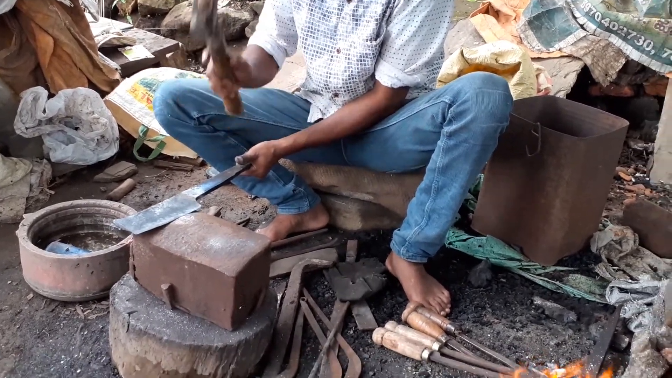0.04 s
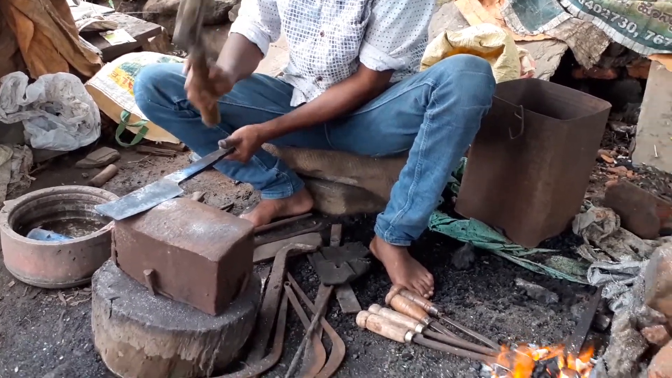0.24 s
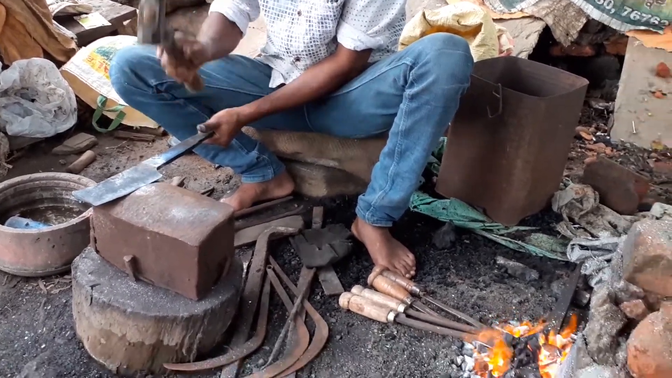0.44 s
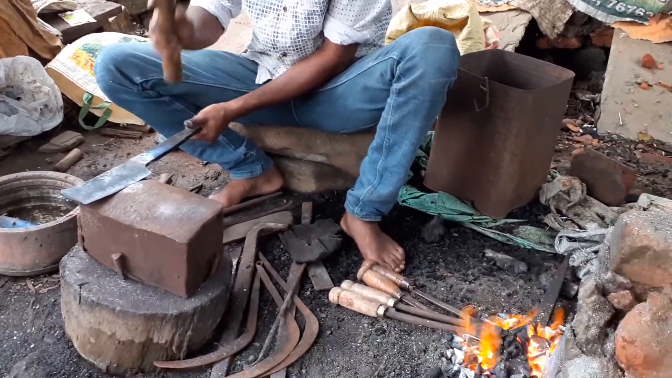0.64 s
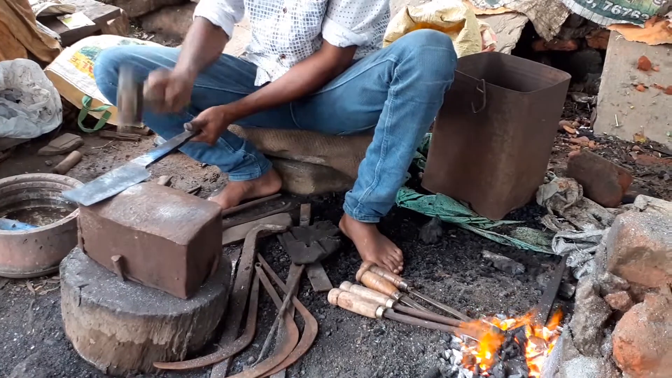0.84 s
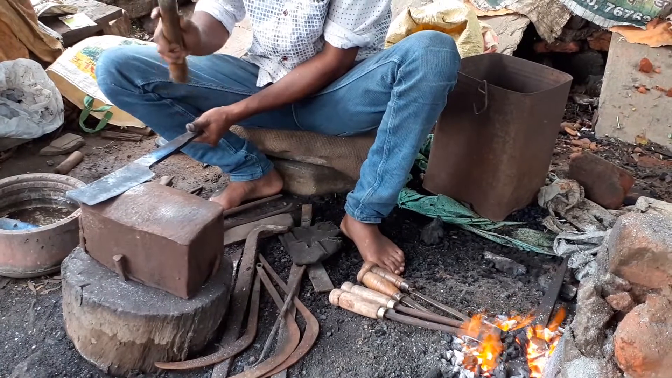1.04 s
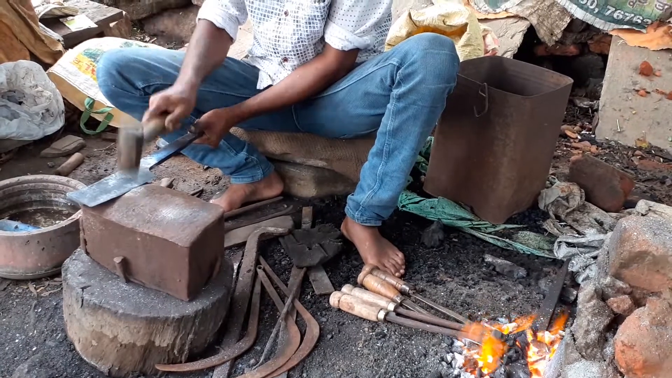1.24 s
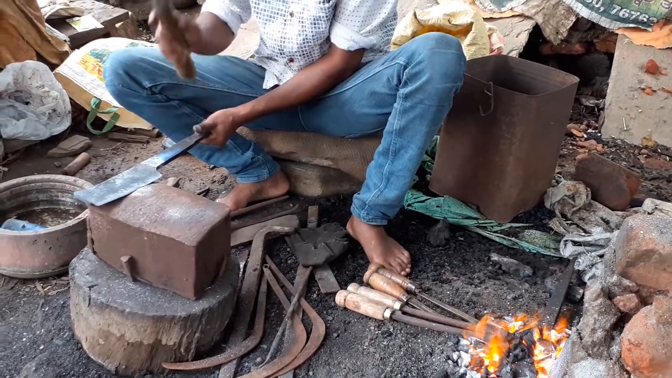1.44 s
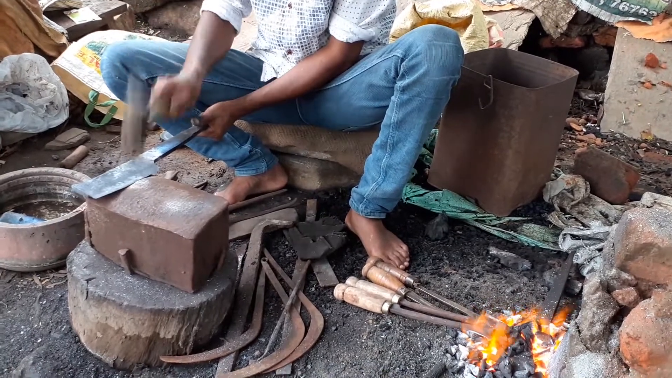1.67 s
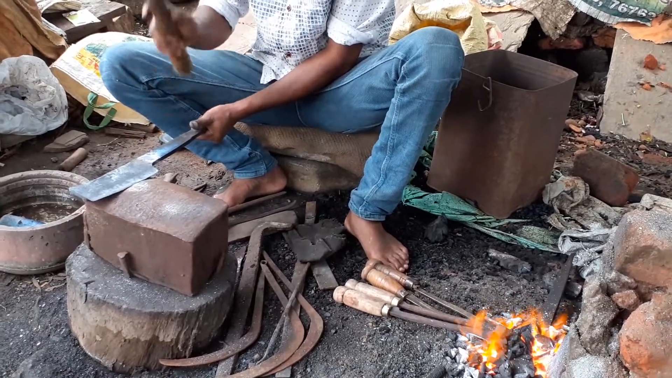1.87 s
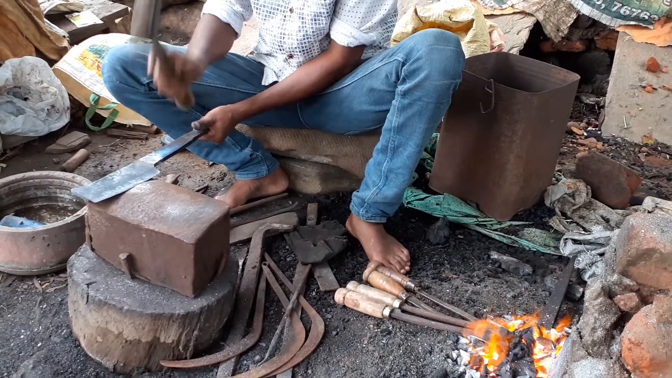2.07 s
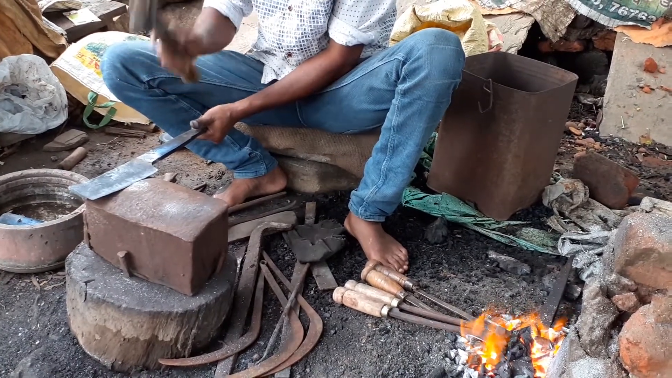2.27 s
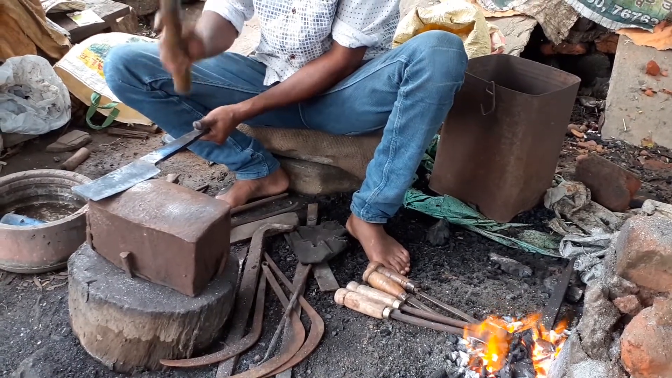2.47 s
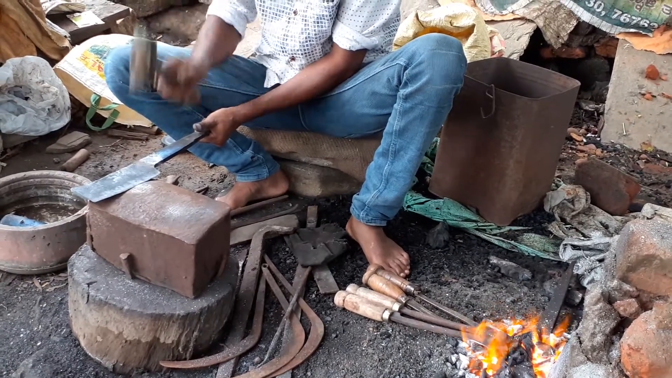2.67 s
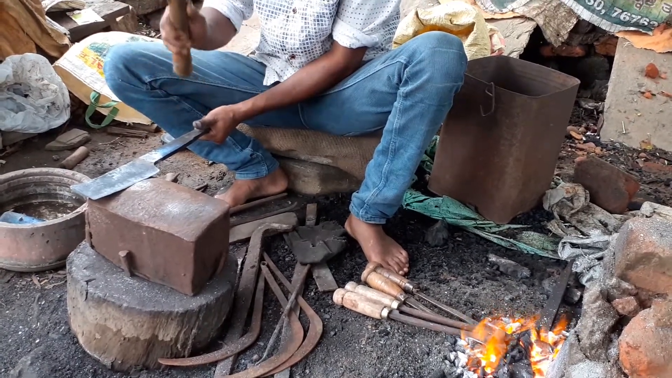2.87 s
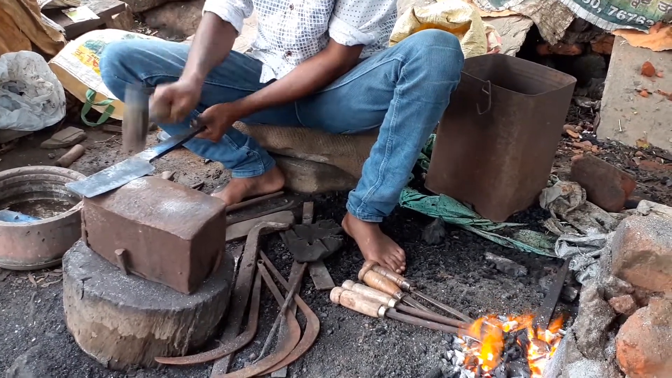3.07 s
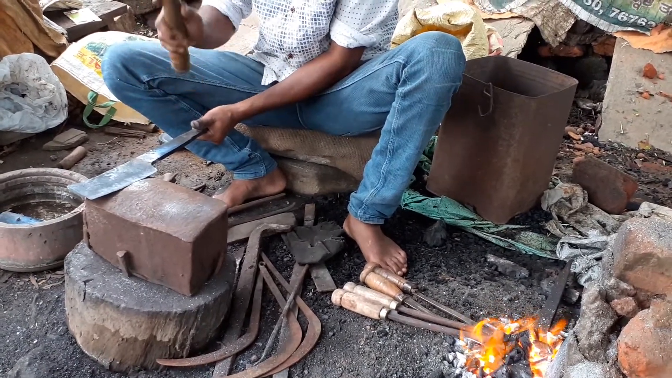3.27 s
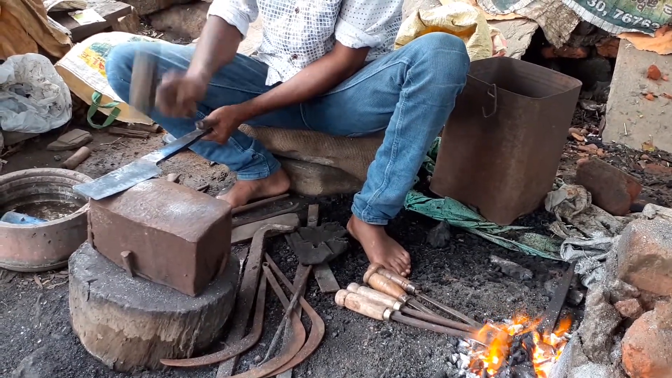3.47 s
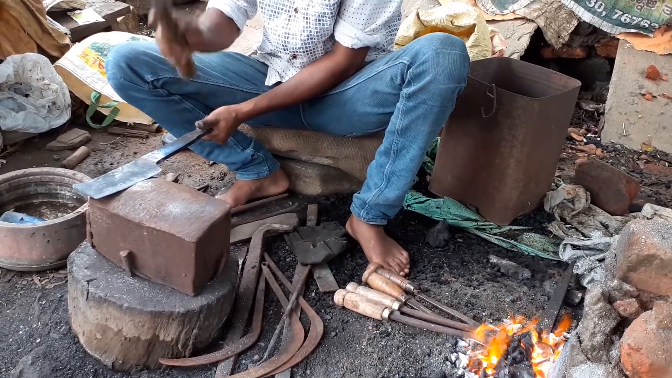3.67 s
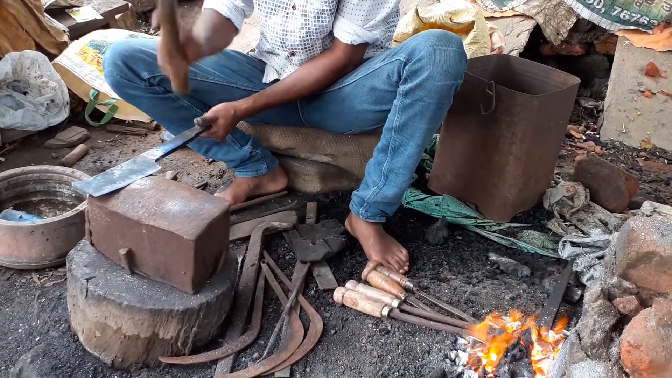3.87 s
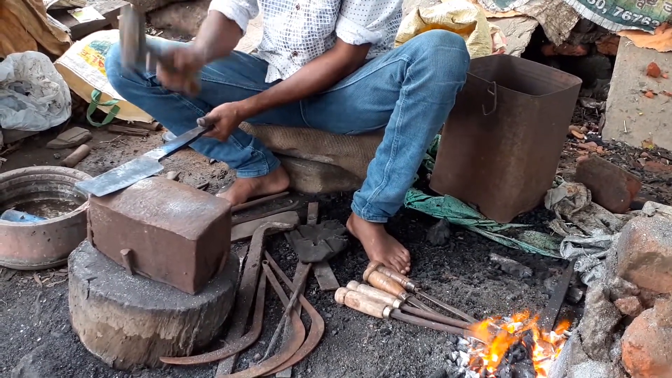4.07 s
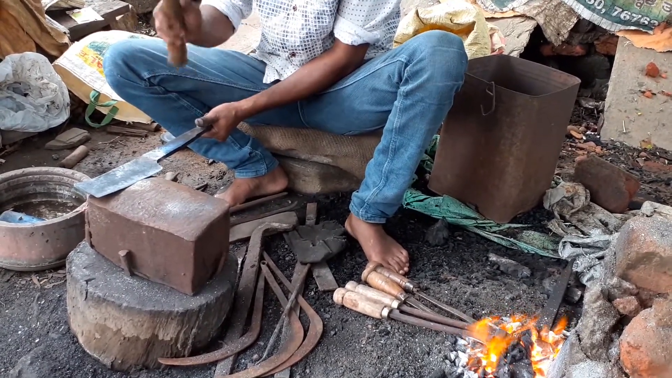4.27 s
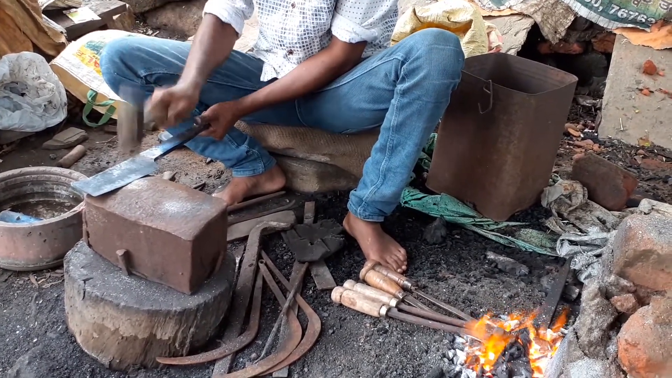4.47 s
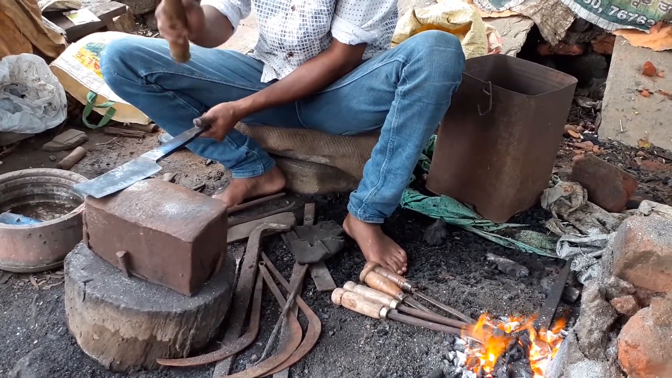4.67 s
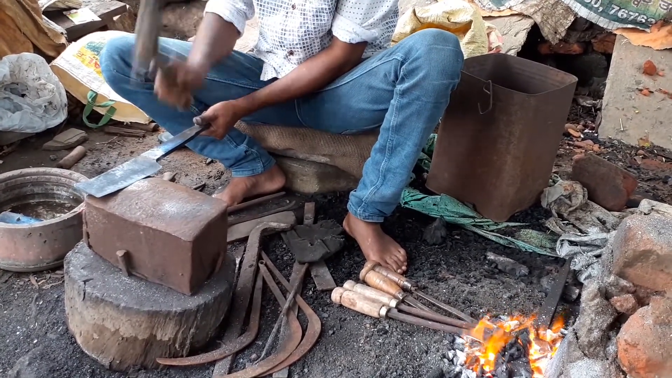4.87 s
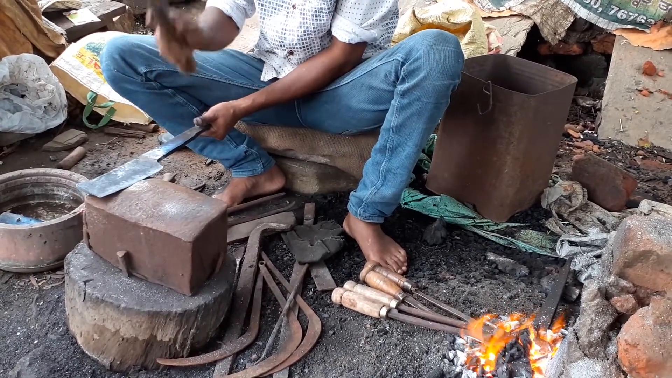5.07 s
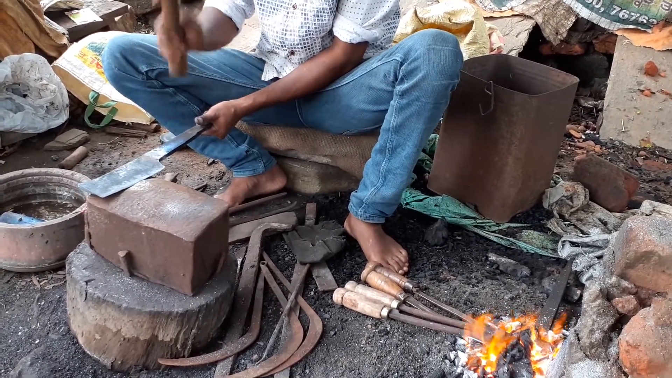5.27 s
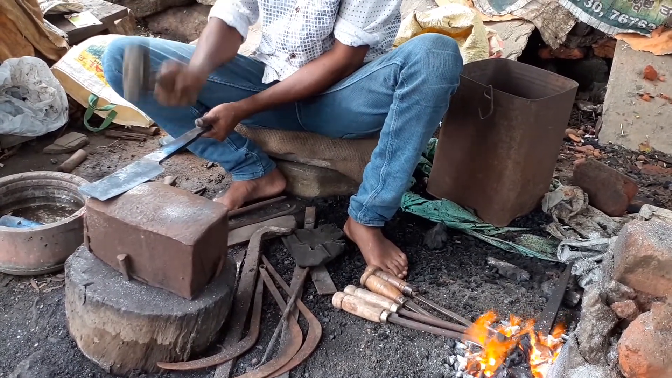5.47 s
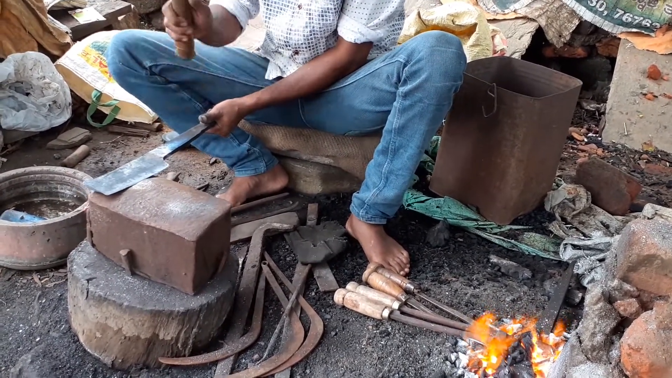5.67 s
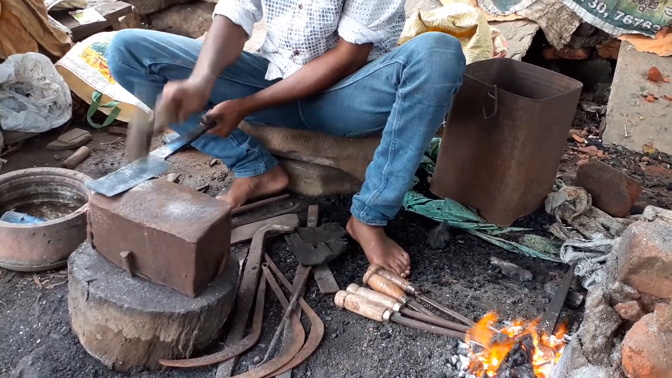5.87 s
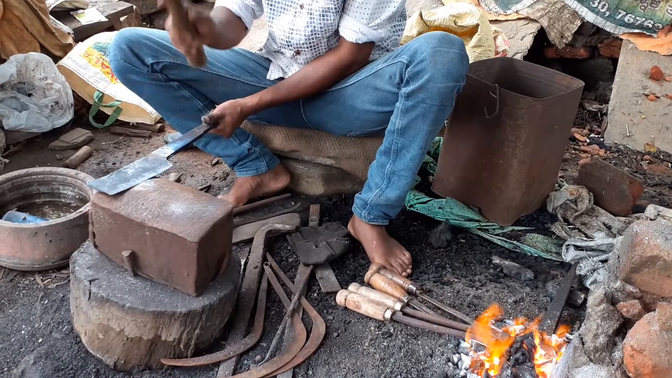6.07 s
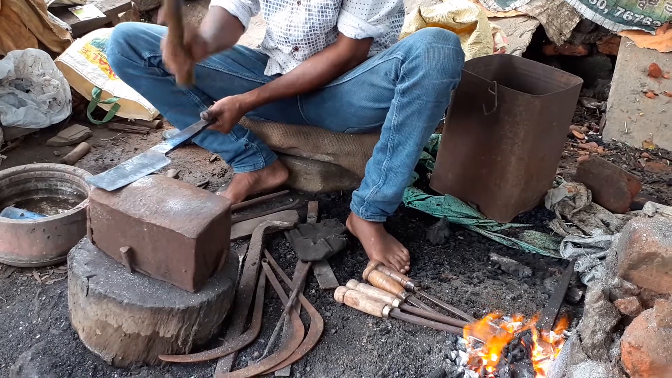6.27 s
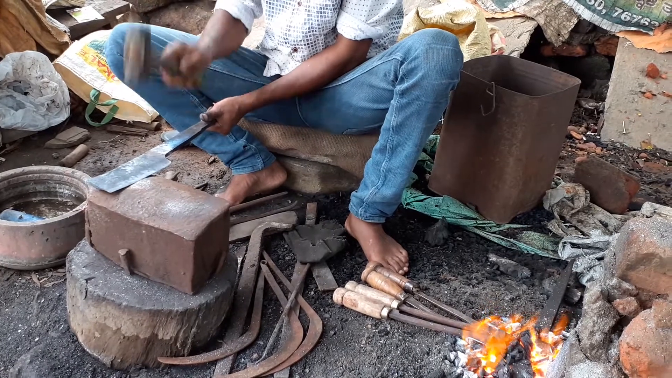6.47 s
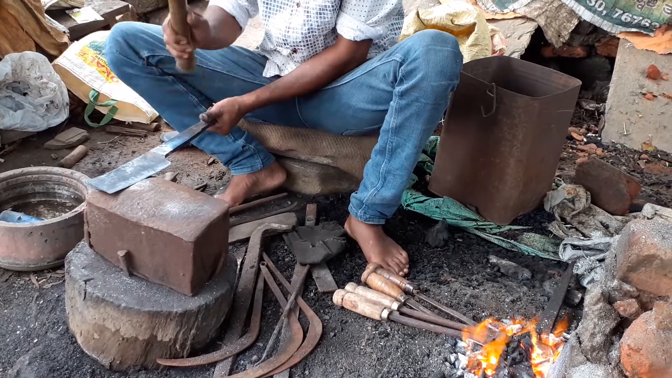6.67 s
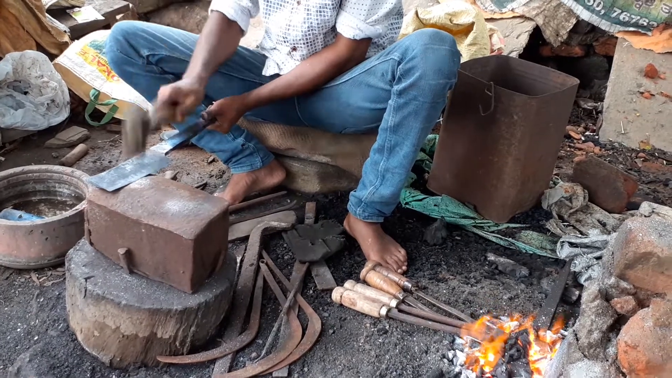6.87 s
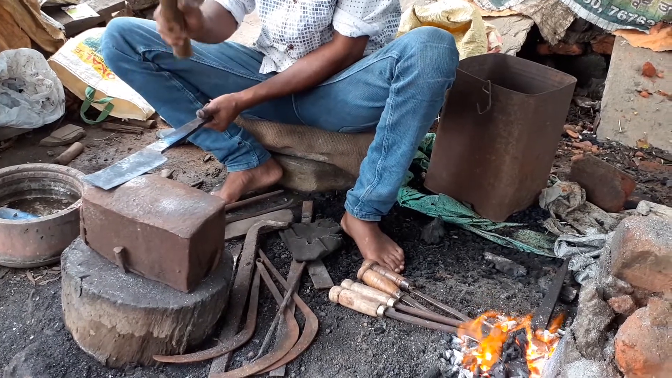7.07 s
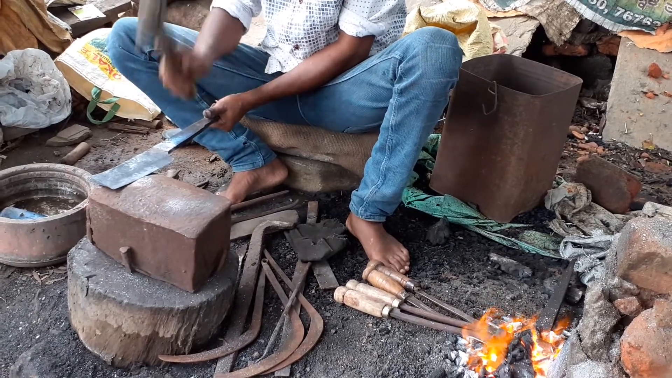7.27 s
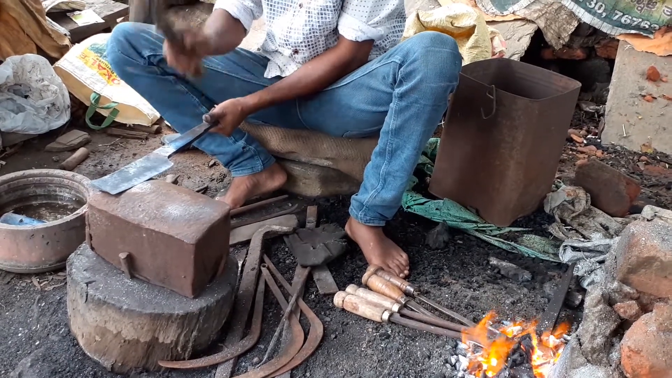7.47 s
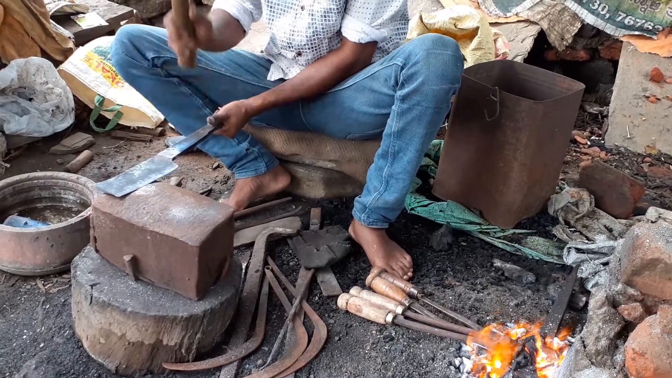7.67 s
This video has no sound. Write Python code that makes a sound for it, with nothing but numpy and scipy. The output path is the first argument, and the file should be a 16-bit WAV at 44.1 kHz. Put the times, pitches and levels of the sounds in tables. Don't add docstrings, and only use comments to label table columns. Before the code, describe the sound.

Close, loud hammer blows on a steel blade and block anvil, evenly about two per second, each a sharp clattering crack with a short thud and a clean high ring cut off by the next blow. A cranked blower rattles and whirrs throughout. Midway a small engine putters past and fades. Open-sided outdoor forge, close stereo microphones, peaks flattened.

```python
import sys
import numpy as np
from scipy import signal
from scipy.io import wavfile
from scipy.ndimage import uniform_filter1d, minimum_filter1d

SR = 44100
rng = np.random.default_rng(int(sys.argv[2]) if len(sys.argv) > 2 else 0)


def int16_out(signal):
    q = np.round(np.clip(np.atleast_2d(signal).T, -1, 1) * 32767)
    wavfile.write(sys.argv[1], SR, q.astype(np.int16))


def linear_from_db(decibels):
    return 10 ** (np.asarray(decibels, float) / 20)


N = 340443


def at_hz(points, hz):
    return np.interp(np.log(hz), np.log(np.array(points)[:, 0]), np.array(points)[:, 1])


def in_time(rows):
    s, *columns = np.transpose(rows)
    return [np.interp(np.arange(N) / SR, s, c) for c in columns]


def rms_one(x):
    return x / np.sqrt(np.mean(x ** 2) + 1e-20)


def pan(db):
    return linear_from_db(np.array([[db / 2], [-db / 2]]))


def left_late(x, size):
    return np.array([np.roll(x[0], size), x[1]])


def filtered(sos, x):
    return signal.sosfilt(sos, x)


def drift(rate_hz):
    r = np.exp(-80 * np.pi * rate_hz / SR)
    noise = rng.standard_normal(N // 40 + 2002)
    slow = signal.lfilter([1], [1, -2 * r, r * r], noise)[2000:]
    return np.interp(np.arange(N) / 40, np.arange(len(slow)), rms_one(slow))


def ring(clicks, hz, t60):
    r, w = linear_from_db(-60 / (t60 * SR)), 2 * np.pi * hz / SR
    return signal.lfilter([0, np.sin(w)], [1, -2 * r * np.cos(w), r * r], clicks + 1e-18)


# pitch_hz, likeness_0_to_1
LIKENESS = [(30, .2), (60, 0.99), (130, 0.96), (300, 1), (700, 0.87), (1500, 0.2), (4000, 0), (8000, 0),
            (15000, 0)]


def bands(low_hz, high_hz, size):
    edges = low_hz * 2 ** np.arange(0, np.log2(high_hz / low_hz) + .3, 1 / 3)
    white = rng.standard_normal((2, 2, size))
    for k, (low, high) in enumerate(zip(edges, edges[1:])):
        band = signal.butter(2, [low, high], "band", fs=SR, output="sos")
        mid, side = filtered(band, white[k % 2])
        hz = np.sqrt(low * high)
        alike = np.clip(at_hz(LIKENESS, hz), 0, 1)
        yield hz, np.sqrt(1 + alike) * mid + np.sqrt(1 - alike) * side * [[1], [-1]]


def wind():
    band = signal.butter(2, [30, 80], "band", fs=SR, output="sos")
    low = filtered(band, rng.standard_normal((2, N)))
    gusts_db = 4.6 * np.array([drift(3.0), drift(5.2)])
    return linear_from_db(-82.0 + gusts_db) * rms_one(low)


# time_s, level_db
ENGINE = [
    (2.9, -52),
    (3.2, -46.5),
    (4.2, -52.5),
    (4.7, -43.5),
    (5.2, -36.5),
    (5.7, -44.5),
    (6.1, -45.5),
    (6.5, -49),
    (7.7, -53.5),
]
# pitch_hz, level_db, t60_s
EXHAUST = [(91.5, 0.5, 0.13), (183.3, 6, 0.095), (260, -19, 0.013)]


def engine():
    firing_at_s, firings_per_s, slowing_per_s2 = 4.574, 23.9, 2.3
    t = np.arange(-1, N) / SR - firing_at_s
    turns = firings_per_s * t - slowing_per_s2 * t ** 2 / 2
    fired = np.diff(np.floor(turns)) > 0
    pulses = np.roll(fired, 310) * linear_from_db(2.5 * rng.standard_normal(N))
    pipe = np.zeros(N)
    for k, (hz, db, t60) in enumerate(EXHAUST):
        pipe += (-1) ** k * linear_from_db(db) * ring(pulses, hz, t60)
    soft = filtered(signal.butter(2, 320, fs=SR, output="sos"), pipe)
    level_db, = in_time(ENGINE)
    return linear_from_db(level_db + 2.0) * rms_one(soft) * (np.arange(N) > ENGINE[0][0] * SR)


# start_s, peak_db
JOLTS = [(0.7494, -33), (1.2186, -31), (1.5135, -28.5), (1.658, -21.5), (2.488, -24), (2.724, -29),
         (2.815, -26), (3.004, -27), (3.348, -23), (3.4855, -31), (5.206, -26.5), (5.8327, -30),
         (6.13, -23.5), (6.273, -33)]


def gear_surge():
    jolts = np.zeros(N)
    jolts[[round(s * SR) for s, db in JOLTS]] = linear_from_db(np.array(JOLTS)[:, 1] + 26)
    return 1 + signal.lfilter([1], [1, -linear_from_db(-60 / (.2 * SR))], jolts)


def after_blows(fade_s):
    struck = np.zeros(N)
    struck[[round(row[0] * SR) for row in BLOWS]] = 1
    return signal.lfilter([1], [1, -np.exp(-1 / (fade_s * SR))], struck)


# pitch_hz, left_minus_right_db
BALANCE_DB = [(60, -0.5), (150, 1), (380, -1), (950, 0), (2380, -1.5), (5980, -14), (15000, -5)]
# pitch_hz, width_hz, rms_db
HOUSING = [(493.6, 17, -53), (2185, 19, -55.5), (2780, 18, -57.5), (3540, 210, -49), (3632, 31, -47),
           (3770, 13, -53), (4460, 22, -58.5), (7520, 120, -46.5)]


def housing_hum(surge):
    out = np.zeros((2, N))
    flutter = linear_from_db(1.5 * drift(15))
    for hz, width_hz, db in HOUSING:
        hum = ring(rng.standard_normal(N), hz, np.log(1000) / (np.pi * width_hz))
        jolted = surge if hz > 900 else 1
        out += linear_from_db(db) * flutter * rms_one(hum) * jolted * pan(at_hz(BALANCE_DB, hz))
    return out


# time_s, rattle_db
BLOWER = [(0.0, -31.5), (0.56, -36), (1.29, -36), (1.6, -32), (2.05, -35.5), (2.95, -35.5), (3.89, -37),
          (4.6, -33), (5.1, -38), (5.45, -32), (5.9, -40), (6.58, -33), (7.12, -36.5), (7.46, -33.5),
          (7.72, -36.5)]
# pitch_hz, level_db per Hz
RATTLE = [(530, -42), (900, -13.5), (1670, -12), (2240, -0.5), (3310, -8.5), (3600, 0), (3920, -8.5),
          (4490, -4), (6010, -14.5), (7480, -6.5), (8550, -5.5), (12000, -4), (15200, -24), (15900, -61),
          (16500, -69)]
# pitch_hz, level_db per Hz
RUMBLE = [(15, -61), (25, -74), (48, -5), (123, -2), (161, 4.5), (438, -10), (487, -11.5), (736, -1.5),
          (864, -31), (962, -6), (1800, -21.5), (2340, -47), (3960, -120)]


def blower():
    crank_db, = in_time(BLOWER)
    surge = gear_surge()
    grit = linear_from_db(2.2 * drift(22) + 1.5 * drift(120))
    rattle_db = crank_db + 10 * after_blows(.091)
    passing = np.exp(-((np.arange(N) / SR - 4.74) / .66) ** 2)
    rumble_db = -49 + .099 * (crank_db + 35.5) + 4.5 * passing
    hiss_db = -6.5 - 9 * after_blows(.16) + 3.0 * drift(35)
    rattle = rumble = 0
    for hz, noise in bands(33.62, 16000, size=N):
        noise = noise * pan(at_hz(BALANCE_DB, hz)) * linear_from_db(2.0 * drift(12))
        rattle = rattle + noise * linear_from_db(at_hz(RATTLE, hz) + hiss_db * (hz > 8500)) * (hz > 900)
        rumble = rumble + noise * linear_from_db(at_hz(RUMBLE, hz)) * (hz < 1800)
    out = linear_from_db(rattle_db - 4.5) * rms_one(rattle) * surge * grit
    out += linear_from_db(rumble_db + 1.5) * rms_one(rumble)
    out += housing_hum(surge)
    notch = signal.butter(5, [8050, 10000], "bandstop", fs=SR, output="sos")
    out = filtered(notch, out) + linear_from_db(-16 + 5 * drift(5)) * out
    out = filtered(signal.cheby2(10, 50, 16000, fs=SR, output="sos"), out)
    return left_late(out, 15)


def add_modes(out, modes, s, level_db, pan_db):
    starts = list(np.round(s * SR).astype(int)) + [N]
    for level, side, start, end in zip(level_db, pan_db + 0 * s, starts, starts[1:]):
        t = np.arange(end - start) / SR
        swell = 1 - np.exp(-t / 0.0097)
        for hz, db, t60, turn in modes:
            sides = np.sin(2 * np.pi * hz * t + turn * np.array([[.5], [-.5]]))
            tone = linear_from_db(level + db - 60 * t / t60) * swell * sides * pan(side)
            out[:, max(start, 0):end] += tone[:, max(-start, 0):]


# start_s, anvil_quick_db, anvil_lasting_db, anvil_second_db, head_db
RING = [(-0.1, -50, -23.5, -30, -42), (0.356, -13.5, -17.5, -17, -41), (0.804, -10.5, -21, -15, -36),
        (1.255, -32, -20.5, -19, -36), (1.714, -15, -18, -20, -41), (2.1635, -25, -25, -22, -47),
        (2.6174, -19, -16, -18.5, -32), (3.075, -10, -16.5, -20, -30.5), (3.5308, -24, -25.5, -18.5, -36),
        (4, -17, -18.5, -18, -29.5), (4.473, -21, -23.5, -16.5, -32), (4.945, -41, -23, -20.5, -28),
        (5.4225, -24, -34, -21, -36.5), (5.9038, -17, -24.5, -23.5, -38), (6.395, -24, -23.5, -15, -42),
        (6.874, -48, -16.5, -21, -48), (7.3615, -22, -20, -22, -43)]
# pitch_hz, level_db, t60_s, left_right_phase_rad
ANVIL = [(7236, 0, .4, -1.5), (7236, 0, 1.6, -1.5), (8861, 0, .28, 1.1)]
HEAD_LOW = [(11873, -8, 1.4, .6), (12075, -7, 1.0, -.7), (12394, -5, 1.0, .3), (12553, -1, .7, 1.2)]
HEAD_HIGH = [(15125, -6, .45, .4), (15417, -5, .55, -.9), (15726, -2, .4, .7)]
HEAD_LONE = [(14475, 0, .55, .3)]
# time_s, main_mode_left_minus_right_db
AIM = [
    (-0.1, 7.5),
    (0.4, 0.2),
    (1.7, -5),
    (3.1, -3),
    (4.5, 1.5),
    (7.4, 4.2),
]
# start_s, level_db, left_minus_right_db
LOOSE = [
    (0.351, -29, -19),
    (0.803, -16, -6),
    (1.257, -25, -3),
    (3.073, -35, 2),
    (4.001, -28, -5),
    (5.423, -30, -2),
    (6.392, -34, 0),
]
# pitch_hz, level_db, t60_s, left_right_phase_rad
LOOSE_MODES = [(1230, -4, .2, 1.0), (3265, 0, .22, 2.7), (4570, -2, .25, -2.4), (5040, -3, .2, -2.0),
               (6230, -7, .25, -1.0), (7496, -2, .24, .1)]


def ringing():
    out = np.zeros((2, N))
    s, quick_db, lasting_db, second_db, head_db = np.transpose(RING)
    aim_db = np.interp(s, *np.transpose(AIM))
    add_modes(out, ANVIL[:1], s, quick_db, aim_db)
    add_modes(out, ANVIL[1:2], s, lasting_db, aim_db)
    add_modes(out, ANVIL[2:], s, second_db, 4 + .7 * aim_db)
    add_modes(out, HEAD_LOW, s, head_db, -3.5)
    add_modes(out, HEAD_HIGH, s, -34 - .15 * (head_db + 37), -9.5)
    add_modes(out, HEAD_LONE, s, -40.2 + .47 * quick_db, -9.5)
    add_modes(out, LOOSE_MODES, *np.transpose(LOOSE))
    return out


# start_s, force_db, low_clank_db, glance_db
BLOWS = [(0.353, -5, -4.5, 2), (0.806, -7.5, -3.5, 3.5), (1.2556, -5.5, -5.5, -1), (1.712, -7, -3, -5.5),
         (2.1631, -7.5, -2, -5), (2.6171, -7.5, -1.5, -4.5), (3.0732, -5.5, -2, -5), (3.53, -5.5, -2.5, -1),
         (4.0008, -5, -2, -1), (4.471, -7, -2, -2.5), (4.9455, -6.5, -0.5, -2), (5.422, -6, -0.5, 0.5),
         (5.9035, -8.5, 0.5, -3.5), (6.3949, -6.5, 0, 3.5), (6.8738, -6.5, -1, -4.5),
         (7.3578, -6.5, -2, -3)]


def blow_colour(hz):
    levels_db = []
    for _, _, clank_db, glance_db in BLOWS:
        thud_db = -8.5 + 1.8 * max(glance_db, 0)
        curve = [(170, thud_db), (900, clank_db), (2500, 0.028), (5500, glance_db)]
        levels_db.append(at_hz(curve, hz))
    return np.array(levels_db)


# pitch_hz, level_db per Hz
CRASH = [(29, -49), (50, -6), (182, -6), (495, -20), (980, -3.5), (1380, -12), (1720, -5), (2940, -2.5),
         (3660, -3), (4780, -8.5), (7240, -8), (7980, -79), (8800, -20.5), (15400, -21.5), (17000, -50)]
# pitch_hz, t60_s
CRASH_T60 = [(60, 0.077), (300, 0.17), (1000, 0.084), (3000, 0.12), (6000, 0.13), (11000, 0.24),
             (16000, 0.057)]


def clatter(t):
    count, size = len(BLOWS), len(t)
    crash = np.zeros((2, count, size))
    for hz, noise in bands(45.03, 16000, size=count * size):
        dull_db = 12.5 * max(np.log2(hz / 8500), 0)
        tail = linear_from_db(-24.5 - dull_db - 60 * t / 0.51)
        fall = linear_from_db(-60 * t / at_hz(CRASH_T60, hz)) + tail
        level_db = at_hz(CRASH, hz) + blow_colour(hz) + 12 - 4 * (2000 < hz < 7500)
        crash += linear_from_db(level_db)[:, None] * fall * noise.reshape(2, count, size)
    return crash * (1 - np.exp(-t / .0008))


BLADE_HZ = [172, 812, 975, 1022, 1230, 1745, 1840, 2232, 2462, 2840, 3268, 3560, 3670, 3990, 4570, 5050,
            5243, 5420, 6045, 6250, 6862, 7496]
BLADE_DB = [-5, -7.5, -1, 0.55, -8.5, 1.5, -1.5, -8, -8, -10.5, -1.7, 1, 4, -13, -10.5, -5.5, -6.5, -12,
            -11.5, -14.5, -8.5, -12.5]
# pitch_hz, t60_s
BLADE_T60 = [(170, .1), (800, .09), (1000, .035), (1800, .025), (2300, .08), (2900, .05), (3600, .045),
             (5200, .07), (7500, .08)]


def blade_modes(t):
    count = len(BLOWS)
    blade = np.zeros((count, len(t)))
    for hz, db in zip(BLADE_HZ, BLADE_DB):
        spot = linear_from_db(2.0 * rng.standard_normal(count)) * rng.choice([-1, 1])
        held_hz = hz * (1 + .005 * rng.standard_normal((count, 1)))
        mode = np.sin(2 * np.pi * held_hz * t) * linear_from_db(-60 * t / at_hz(BLADE_T60, hz))
        blade += (spot * linear_from_db(db + blow_colour(hz) - 6))[:, None] * mode
    return blade


# late_s, left_db, right_db
ECHOES = [
    (0, 1, 4.5),
    (.0066, 1, -2),
    (.0085, -9.5, 3.5),
    (0.0119, 2, -10),
    (.016, -8.5, -4.5),
    (.022, -14.5, -8.5),
    (.029, -28, -15.5),
]
# low_hz, high_hz
THIN_HZ = [330, 2200]


def blows(size=9000):
    out, t = np.zeros((2, N + size)), np.arange(size) / SR
    thinner = signal.butter(1, THIN_HZ, "bandstop", fs=SR, output="sos")
    crash = clatter(t)
    thin = filtered(thinner, crash)
    crash = thin + (crash - thin) * np.clip(t / ECHOES[1][0], 0, 1) ** 2
    blade = blade_modes(t)
    for k, (start_s, force_db, _, _) in enumerate(BLOWS):
        at, heard = round(start_s * SR), crash[:, k].copy()
        burst = blade[k] + 1.66 * crash[0, k] * linear_from_db(-60 * t / 0.011)
        tick = filtered(thinner, burst)
        for late_s, left_db, right_db in ECHOES:
            late = round(late_s * SR)
            source = burst if late_s > .003 else tick
            heard[:, late:] += linear_from_db(np.array([[left_db], [right_db]])) * source[:size - late]
        out[:, at:at + size] += linear_from_db(force_db) * pan(-2.5) * heard
    out = filtered(signal.cheby2(10, 40, 16600, fs=SR, output="sos"), out)
    return left_late(out[:, :N], -6)


def scene():
    return wind() + engine() + blower() + ringing() + blows()


def roll_off(x):
    return signal.sosfilt(signal.butter(12, 17150, fs=SR, output="sos"), x)


def record(dry):
    heard = filtered(signal.butter(3, 40, "high", fs=SR, output="sos"), dry)
    release_db = 450 / SR * np.arange(N)
    level_db = 20 * np.log10(np.abs(heard).max(axis=0) + 1e-9)
    held_db = np.maximum.accumulate(level_db + release_db) - release_db
    cut_db = -.8 * np.maximum(held_db + .5, 0)
    cut_db = uniform_filter1d(minimum_filter1d(cut_db, size=41), size=41)
    rounded = 1.184 * np.tanh(heard * linear_from_db(cut_db) / 1.077)
    rounded = filtered(signal.cheby2(8, 50, 17600, fs=SR, output="sos"), rounded)
    return roll_off(rounded)


dry = scene()
out = record(dry)
int16_out(out)
```